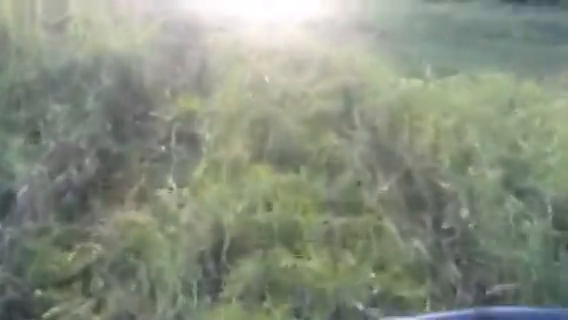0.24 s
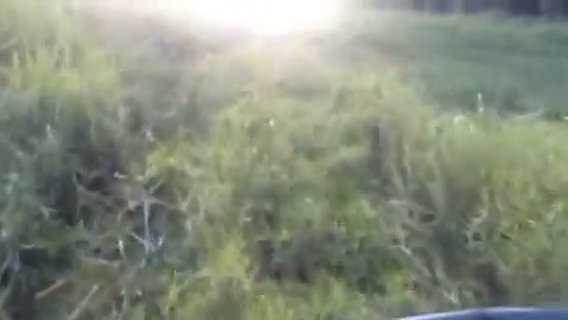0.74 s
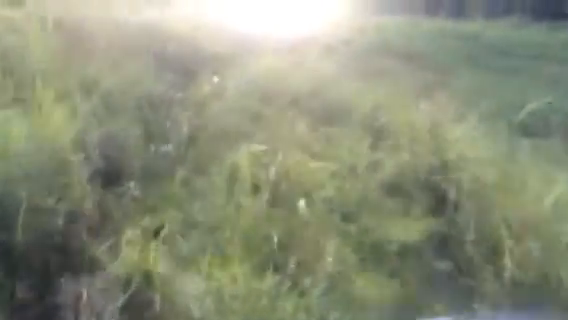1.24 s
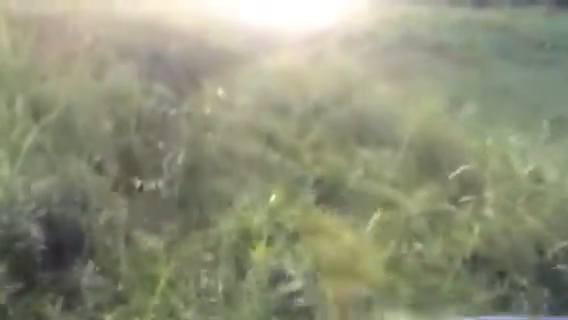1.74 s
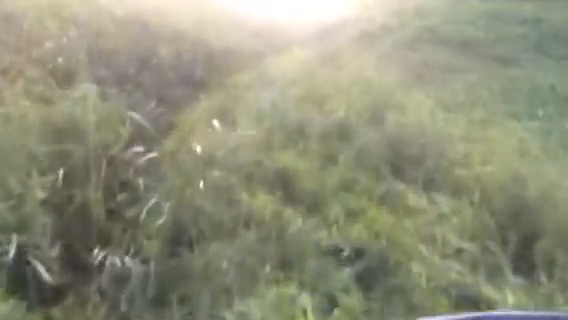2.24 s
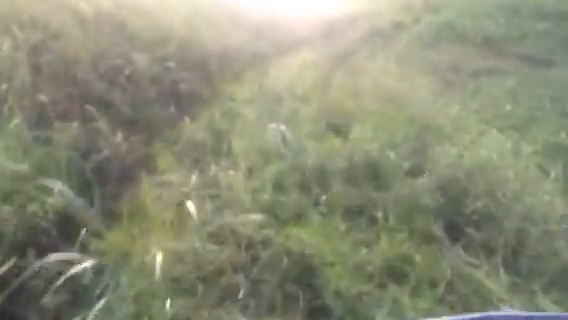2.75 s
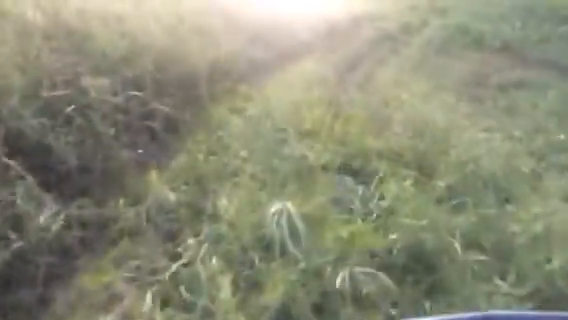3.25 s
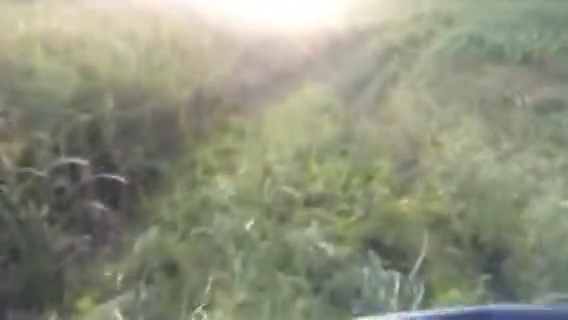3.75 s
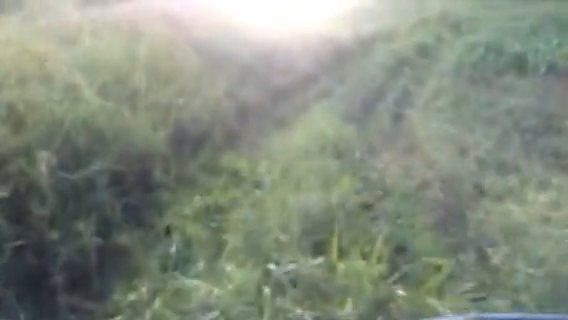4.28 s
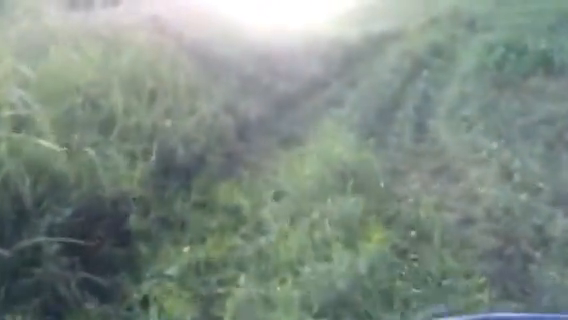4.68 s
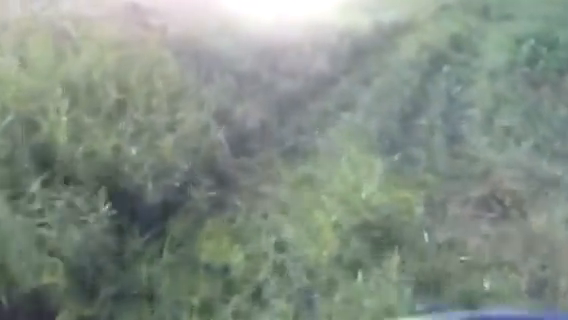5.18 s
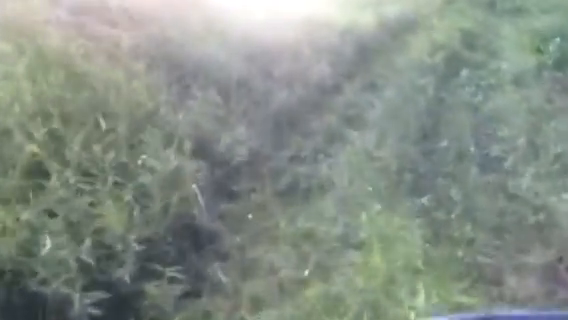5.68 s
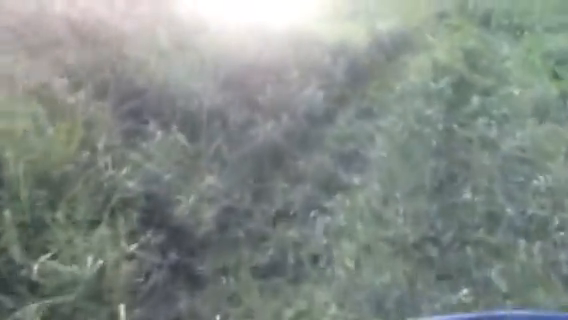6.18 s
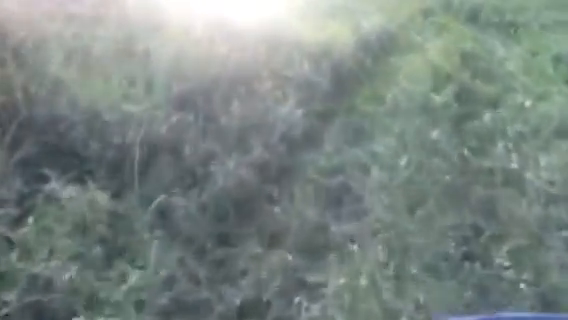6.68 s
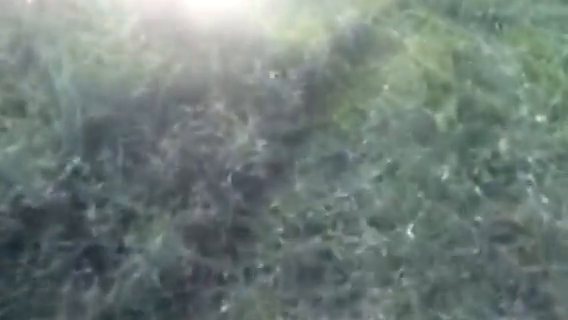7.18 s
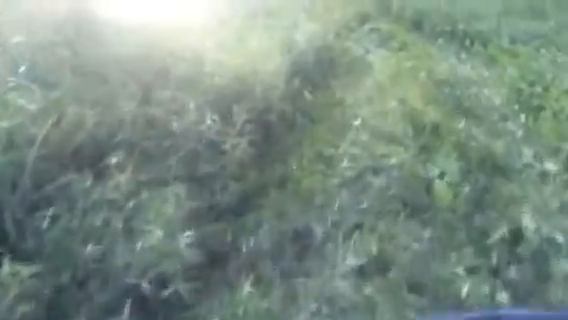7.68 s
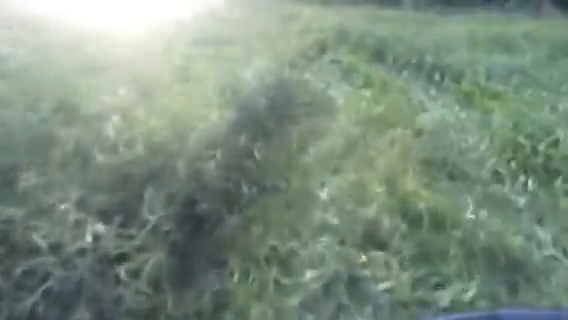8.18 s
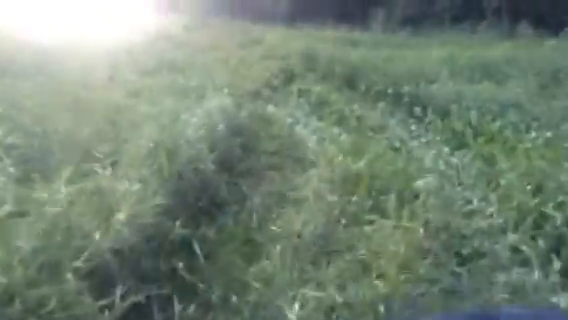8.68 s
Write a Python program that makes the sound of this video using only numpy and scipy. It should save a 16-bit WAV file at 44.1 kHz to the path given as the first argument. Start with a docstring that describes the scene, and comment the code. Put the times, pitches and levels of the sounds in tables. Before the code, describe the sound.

A small four-stroke off-road vehicle drones with a low, rapid putter, heard from the seat as it crosses a field. Tyres rumble, gears whine faintly, and tall grass brushes and ticks against the front over a thin insect buzz. After about three seconds the engine sags and hardens under load. A thud and a short rattling clack shake the body midway, then the engine recovers its even drone.

```python
"""In a field of tall grass, heard from the seat of a small four-stroke off-road vehicle.
Each firing excites the muffler, so the engine drones in harmonics of the firing rate. On rough ground
it sags, its note hardens, and two jolts ring the modes of a body panel and shake loose parts.
Meshing gears whine faintly over the rumble of the tyres, stalks brush and snap on the front,
and insects buzz in the field as the vehicle passes."""
import sys
import numpy as np
from scipy import signal
from scipy.fft import rfft, irfft, next_fast_len
from scipy.io import wavfile
from scipy.ndimage import uniform_filter1d

SR = 44100
rng = np.random.default_rng(int(sys.argv[2]) if len(sys.argv) > 2 else 0)


def log_audio(samples):
    """Write samples as a 16-bit WAV file to the path given in sys.argv[1]."""
    # one column per channel
    frames = np.atleast_2d(samples).T
    # limit to full scale, then quantise
    limited = np.clip(frames, -1, 1)
    pcm = np.round(limited * 32767).astype(np.int16)
    wavfile.write(sys.argv[1], SR, pcm)


N = 393813
TIME = np.arange(N) / SR


# harmonics of the exhaust: order, light_throttle_db, open_throttle_db
EXHAUST_HARMONICS = [(2, -41, -58), (4, -35, -36.5), (5, -25, -25.5), (6, -22.5, -23.5), (7, -36.5, -40.5),
                     (8, -59.5, -31.5), (9, -50.5, -28.5), (10, -46.5, -34), (11, -45.5, -53.5),
                     (12, -68, -44), (13, -62, -50), (14, -64.5, -52)]
# muffler resonances, from thud to bark: centre_order, half_width_orders, delay_cycles
MUFFLER_CHAMBERS = [(4, .5, .76), (5.65, .5, .758), (8.6, .5, .792), (10.2, .5, .771), (11, .5, .745),
                    (12.6, .5, .785)]
# weak firings as the engine bogs down: centre_s, depth_db, half_length_s
WEAK_FIRINGS = [(3.143, -17, 0.022), (3.307, -6, 0.09), (3.78, -5, 0.12)]
def exhaust(turns, rate, throttle, jitter_cycles=0.0042, uneven_db=0.45, waver_db=0.8, gas_db=-41):
    """Periodic excitation: each firing rings the muffler in a putt of harmonics and a puff of gas."""
    stumble_db = sum(db * np.exp(-((TIME - s) / half) ** 2) for s, db, half in WEAK_FIRINGS)
    lull = cycle_pulse(turns, at=0.604, half=0.069)  # the quiet just before each firing
    lull_db = (-2 - 7 * throttle ** 2) * lull  # deeper under load, so the beats harden
    speed_db = 0.5 * (rate - 19)  # louder as the engine runs faster
    unrest = 1 + 1.1 * throttle ** 2  # a labouring engine fires less evenly
    crank = turns + jitter_cycles * unrest * each_firing(turns)
    note = gas_puffs(lull) * gain_of(gas_db) * np.sqrt(unrest)
    boom_order = MUFFLER_CHAMBERS[1][0]
    for order, light_db, open_db in EXHAUST_HARMONICS:
        centre, half_width, delay = min(MUFFLER_CHAMBERS, key=lambda chamber: abs(order - chamber[0]))
        lag = np.arctan((order - centre) / half_width)  # phase shift of the nearest resonance
        off_boom = np.clip(abs(order - boom_order) - .5, 0, 2)  # the boom is steady, the bark varies
        db = light_db + throttle * (open_db - light_db) + waver_db * off_boom * drift(8.3)
        db += stumble_db * (0.28 if off_boom > 1 else 1)  # a weak firing loses mostly its boom
        note += np.sqrt(2) * gain_of(db) * np.cos(2 * np.pi * order * (crank - delay) - lag)
    return note * gain_of(speed_db + lull_db + uneven_db * unrest * each_firing(turns))


# spectrum of the exhaust gas: frequency_hz, density_db
GAS_SPECTRUM = [(40, -23), (75, 1), (120, -1.5), (160, -1), (215, -8.5), (300, -27.5), (600, -58)]
def gas_puffs(lull):
    """Pulsating flow: the low noise of escaping gas stops in each lull."""
    return (1 - lull) * noise(GAS_SPECTRUM)


# impacts of piston, then valves: phase_cycles, strength, half_length_cycles
ENGINE_CLACKS = [(.08, 0.26, .15), (.39, 0.25, 0.15)]
# modes of the block and covers: pitch_hz, bandwidth_hz, level_db
BLOCK_MODES = [(331, 79, 4.5), (470, 103, -2), (720, 120, -7), (970, 67, -5), (1317, 220, -5),
               (1688, 21, -12), (2517, 31, -15.5)]
# spectrum of the churning drive: frequency_hz, density_db
CHURN_SPECTRUM = [(120, -2), (220, 6), (400, -3.5), (650, -2.5), (1100, -6), (1500, -12.5), (2200, -21.5),
                  (4000, -25), (9000, -53)]
def clatter(turns, throttle, ring_db=-47, churn_db=-46, grain_db=1.33):
    """Impact excitation: piston and valves ring the block, harder under load, as the drive churns."""
    clacks = sum(size * (1 + 0.62 * drift(22)) * cycle_pulse(turns, at, half)
                 for at, size, half in ENGINE_CLACKS)
    beat = 1 + (clacks - clacks.mean()) * (1 + 0.34 * throttle)
    force = beat * rng.standard_normal(N) * gain_of(grain_db * drift(220))
    ring = sum(gain_of(db) * resonate(force, hz, width).real / np.sqrt(width)
               for hz, width, db in BLOCK_MODES)
    churn = noise(CHURN_SPECTRUM) * abs(beat) ** 0.55 * gain_of(0.47 * drift(90))
    return gain_of(ring_db) * evened(ring) + gain_of(churn_db) * evened(churn)


# spectrum of the rolling tyres: frequency_hz, density_db
TYRE_SPECTRUM = [(12, -6), (25, 8), (38, 5), (55, 17), (80, 7.5), (120, 16), (170, 7.5), (260, -14.5),
                 (500, -40)]
def ride(turns, rumble_db=-34, shudder_db=-44.5, shudder_hz=38, wander_hz=7):
    """Forced vibration: tyres rumble, shaken by each firing; the frame shudders at a wandering pitch."""
    shake = 1 + 0.044 * np.cos(2 * np.pi * (turns - .02))
    shudder = np.sqrt(2) * np.sin(phase_of(shudder_hz + wander_hz * drift(2)))
    return gain_of(rumble_db) * shake * noise(TYRE_SPECTRUM) + gain_of(shudder_db) * shudder


# blows on the body: start_s, peak_db, centre_hz
BODY_BLOWS = [(4.814, -8.5, 159), (4.825, -12, 203), (4.821, -23, 496), (4.832, -41, 1300),
              (4.876, -27, 205), (5.5, -45, 1321), (4.973, -23.5, 200), (4.982, -34, 750),
              (4.998, -31, 240), (5.019, -39, 480), (5.058, -26.5, 285), (5.0585, -19, 580),
              (5.064, -35, 1500), (5.069, -29, 705), (5.7, -39, 620), (6.4, -50, 900)]
# modes of a body panel: pitch_hz, level_db, decay_s (to fall about 40 dB)
PANEL_MODES = [(139, 10.5, 0.043), (175, 11, 0.061), (239, 10, 0.07), (320, -2, 0.053), (408, 9, 0.022),
               (525, 7.5, 0.04), (608, 10.5, 0.03), (690, 3, 0.082), (994, 14.5, 0.035), (1540, -3, 0.012),
               (2440, 8, 0.03)]
def knocks(band_ratio=1.21, chatter_db=-44, chatter_t60_s=0.36, direct_db=-8):
    """Modal ringing: soft blows excite a panel's low modes and thud; hard ones reach higher and clack."""
    out, t = np.zeros(N), np.arange(SR // 4) / SR
    for s, peak_db, blow_hz in BODY_BLOWS:
        jolt = gain_of(chatter_db - 60 * t / chatter_t60_s) * rng.standard_normal(len(t))
        jolt[0] = -1  # the impulse ahead of the chatter
        band_hz = [blow_hz / band_ratio, blow_hz * band_ratio]
        blow = signal.lfilter(*signal.butter(2, band_hz, "bandpass", fs=SR), jolt)
        ring = sum(gain_of(db) * resonate(blow, hz, 1.48 / decay).real for hz, db, decay in PANEL_MODES)
        direct = peaked(blow, direct_db) * blow_hz / (blow_hz + 700)
        add(out, s, peaked(peaked(ring) + direct, peak_db))
    return out


# bursts of rattling: peak_s, level_db, rise_s, fall_s
RATTLE_SWELLS = [(4.83, -52, 0.011, 0.027), (4.98, -45.5, 0.045, 0.047), (5.064, -35, .006, 0.017)]
# spectrum of the loose parts: frequency_hz, density_db
LOOSE_SPECTRUM = [(120, -15), (270, 11), (450, 1), (1050, -3), (1700, -5), (2700, -10), (5000, -32)]
def rattle(grain_db=4):
    """Random amplitude modulation: loose parts chatter roughly around the two jolts."""
    return swells(RATTLE_SWELLS) * evened(noise(LOOSE_SPECTRUM) * gain_of(grain_db * drift(300)))


COVER_HZ, COVER_WIDTH_HZ = 1085.6, 51  # resonance of the thin gear cover
FLICKER_DB = 2.5  # rms waver in the level of the gear tones
# tone of the final drive, following ground speed: time_s, pitch_hz
DRIVE_PITCH = [(0, 995), (1.3, 990), (1.7, 965), (2.3, 977), (2.6, 957), (3.1, 943), (3.6, 899), (3.8, 848),
               (4.5, 782), (5.3, 765), (6.3, 815), (6.8, 830), (7.0, 884), (7.3, 886), (7.5, 925),
               (8.0, 948), (8.5, 942), (8.93, 918)]
# whine as the teeth take up load: peak_s, level_db, rise_s, fall_s
WHINE_SWELLS = [(.1, -54, 0.079, 0.17), (.65, -59, 0.18, .15), (1.2, -52.5, 0.3, 0.4),
                (2.2, -58, 0.38, 0.52), (2.85, -54.5, 0.32, 0.67), (3.65, -53.5, 0.088, 0.29),
                (4.5, -59, 0.63, 0.51), (7.15, -54.5, 0.35, 0.32), (8.1, -54.5, 1, 2.1)]
def final_drive(flutter=0.011, pair_ratio=4 / 3, pair_db=-56.5):
    """Gear meshing: the drive whines, and a second pair sounds as it crosses the cover's resonance."""
    hz = curves(DRIVE_PITCH)[0]
    mesh = phase_of(hz * (1 + flutter * drift(60)))
    whine = swells(WHINE_SWELLS) * gain_of(FLICKER_DB * drift(23)) * np.sin(mesh)
    pair = gain_of(pair_db + FLICKER_DB * drift(23)) * np.sin(pair_ratio * mesh)
    detuning = (pair_ratio * hz - COVER_HZ) / (COVER_WIDTH_HZ / 2)
    return np.sqrt(2) * (whine + pair / np.hypot(1, detuning))


# singing of the timing gear: peak_s, level_db, rise_s, fall_s
TIMING_SWELLS = [(0, -55, .1, 0.16), (.58, -52, 0.21, 0.24), (1.6, -59, 0.63, 1)]
def timing_gear(turns, order=35):
    """Gear meshing: a wavering tone at a high multiple of the firing rate."""
    level = swells(TIMING_SWELLS) * gain_of(FLICKER_DB * drift(23))
    return np.sqrt(2) * level * np.sin(2 * np.pi * order * turns + 0.56 * drift(20.64))


# shaft tones at resonance: order, light_throttle_db, open_throttle_db, resonant_firing_hz
SHAFT_TONES = [(15, -56, -61, 19.4), (17, -52.5, -80, 19.1), (19, -54, -44, 19.6)]
def shafts(turns, rate, throttle, half_width_hz=0.5):
    """Resonance: each shaft tone follows the engine and is reinforced near one firing rate."""
    out = np.zeros(N)
    for order, light_db, open_db, resonant_hz in SHAFT_TONES:
        db = light_db + throttle * (open_db - light_db) + 0.69 * drift(5.4)
        level = gain_of(db) / np.hypot(1, (rate - resonant_hz) / half_width_hz)
        out += level * np.sin(2 * np.pi * order * turns + 1.17 * drift(22))
    return np.sqrt(2) * out


def cover(level_db=-60):
    """Natural frequency: shaken by the drive, the thin gear cover rings faintly at its own pitch."""
    return gain_of(level_db) * whistle(COVER_HZ, COVER_WIDTH_HZ)


# patches of taller grass: peak_s, level_db, rise_s, fall_s
TALL_PATCHES = [(.4, -59, .5, 0.28), (2.3, -64.5, 0.34, 0.55), (3.6, -57.5, 0.38, 0.97),
                (5.32, -58, 0.19, 0.23), (8.9, -57, 0.75, .5)]
# spectrum of brushing blades: frequency_hz, density_db
BRUSH_SPECTRUM = [(800, -21), (2000, -2), (3000, -2.5), (3800, 3.5), (4900, 0.5), (6400, 4), (7600, -2),
                  (9000, -11), (12000, -22), (15400, -14)]
def grass(steady_db=-56):
    """Friction noise: blades brush the vehicle in a fine hiss, louder in tall patches."""
    level = np.hypot(gain_of(steady_db), swells(TALL_PATCHES))
    return level * gain_of(0.28 * drift(250)) * noise(BRUSH_SPECTRUM)


# thick stalks hitting the front: start_s, peak_db, centre_hz, bandwidth_hz, scrape_t60_s
STALK_HITS = [(0.468, -28.5, 3000, 960, 0.015), (0.4687, -30, 9000, 8000, .008),
              (.587, -37, 4500, 4000, .015), (1.262, -33.5, 7500, 5000, 0.017),
              (1.283, -34, 7000, 5000, .012), (1.365, -36, 6500, 4000, .012),
              (1.4906, -27.5, 5630, 4500, 0.014), (1.495, -36, 5430, 4500, .025),
              (1.663, -30, 6500, 5000, 0.007), (1.683, -32, 6600, 5030, 0.035),
              (1.788, -30.5, 6230, 4800, .045), (3.025, -39, 12500, 7000, .03),
              (3.745, -37, 6300, 2000, .02), (3.902, -35, 7000, 3960, 0.06),
              (4.022, -38, 7500, 4000, 0.032), (5.022, -37, 11000, 6000, .02),
              (5.288, -35, 9000, 7040, 0.12), (5.338, -35, 6000, 5000, 0.055),
              (6.948, -43, 11500, 3950, 0.08), (7.932, -37, 7400, 4060, 0.033),
              (8.608, -35, 13970, 3040, 0.025)]
def stalks(scrape_db=-15):
    """Heavily damped impact: each stalk snaps against the front and scrapes off."""
    out, t = np.zeros(N), np.arange(SR // 8) / SR
    for s, db, hz, width, t60 in STALK_HITS:
        crack = rng.standard_normal(len(t)) * gain_of(scrape_db - 60 * t / t60)
        crack[0] = 1  # the impulse ahead of the scrape
        snap = resonate(resonate(crack, hz, width), hz, width).real
        add(out, s, peaked(snap, db))
    return out


def seed_heads(per_s=22, level_db=-63, decay_s=0.025):
    """Shot noise: seed heads tick on the bodywork at random, a few harder than the rest."""
    strength = gain_of(3 * np.minimum(rng.exponential(1, N), 3))
    hits = strength * (rng.random(N) < per_s / SR)
    envelope = signal.lfilter([1], [1, -np.exp(-1 / (decay_s * SR))], hits)
    hiss = noise([(1500, -15), (3000, -2), (6500, 0), (9500, -9), (15400, -17)])
    return gain_of(level_db) * evened(envelope * hiss)


# groups of insects passed: peak_s, level_db, rise_s, fall_s
CHORUS_SWELLS = [(.45, -51, 1, 0.31), (1.4, -55, 0.94, 0.77), (2.1, -48.5, 0.39, 0.74),
                 (2.6, -52, 0.34, 0.45), (3.175, -52, .015, 0.55), (4.1, -56, 0.95, 1.3),
                 (5.2, -52.5, 0.22, 0.66), (6.3, -65, .4, .4), (8.3, -65, .4, .4)]
# spectrum of their buzz: frequency_hz, density_db
CHORUS_SPECTRUM = [(3000, -2), (6000, 0.5), (8000, 1.5), (10500, 2), (13500, 3), (15400, -0.5)]
def insect_chorus():
    """Incoherent sources: many singers merge into a high noise that swells as each group is passed."""
    return swells(CHORUS_SWELLS) * noise(CHORUS_SPECTRUM)


# rasps of one close bush cricket: peak_s, level_db, rise_s, fall_s
CRICKET_RASPS = [(1.76, -52, 0.93, 0.08), (1.865, -44.5, 0.014, .14), (2.02, -46.5, .07, .04)]
# spectrum of a rasp: frequency_hz, density_db
RASP_SPECTRUM = [(6000, -30), (10000, -5), (12000, 0), (14000, 4), (15400, -2.5)]
def cricket(wing_hz=44):
    """Stridulation: wing strokes pulse a very high noise into a rasp."""
    stroke = 2 * np.pi * wing_hz * TIME + .7 * drift(10)
    wings = (.6 + .4 * np.cos(stroke)) ** 1.5 * gain_of(1.5 * drift(30))
    return swells(CRICKET_RASPS) * evened(wings * noise(RASP_SPECTRUM))


# thin insect trills: peak_s, level_db, rise_s, fall_s
TRILL_SWELLS = [(3.4, -64, 0.7, 1.6), (5.9, -68, 0.47, 1.5)]
def insect_trills(pitch_hz=8130, width_hz=300, pulse_hz=70):
    """Amplitude modulation: rapid pulses break a thin whistle into a trill."""
    pulses = (.5 + .5 * np.cos(phase_of(pulse_hz + 9 * drift(9.6)))) ** 2
    return swells(TRILL_SWELLS) * evened(pulses * whistle(pitch_hz, width_hz))


# short high insect chirps: peak_s, level_db
HIGH_CHIRPS = [(5.812, -58), (6.985, -59), (8.24, -58)]
def insect_chirps(pitch_hz=14600, width_hz=350, half_s=0.018):
    """Tone bursts: each chirp is a brief swell of a very high whistle."""
    return swells([(s, db, half_s, half_s) for s, db in HIGH_CHIRPS]) * whistle(pitch_hz, width_hz)


def gain_of(db):
    """Decibels to amplitude."""
    return 10 ** (np.asarray(db) / 20)


def evened(x):
    """Normalisation to rms 1."""
    return x / np.sqrt(np.mean(x ** 2) + 1e-20)


def peaked(x, db=0):
    """Normalisation to a peak level."""
    return gain_of(db) * x / abs(x).max()


def phase_of(hz):
    """Phase in radians, the integral of frequency."""
    return 2 * np.pi * np.cumsum(hz) / SR


def curves(rows):
    """Linear interpolation of each column of a timed table."""
    s, *columns = np.transpose(rows)
    return [np.interp(TIME, s, column) for column in columns]


def swells(rows):
    """Power addition: the joint amplitude of sounds that each rise to a peak and fall away."""
    t = TIME[::64]
    power = sum((gain_of(db) * np.exp(-((t - s) / np.where(t < s, rise, fall)) ** 2)) ** 2
                for s, db, rise, fall in rows)
    return np.interp(TIME, t, np.sqrt(power))


def cycle_pulse(turns, at, half):
    """A Gaussian pulse of height 1 in every cycle; position and half length are in cycles."""
    return np.exp(-(((turns - at + .5) % 1 - .5) / half) ** 2)


def each_firing(turns):
    """Sample and hold: a random value drawn for every firing and kept while it rings."""
    return uniform_filter1d(rng.standard_normal(200)[(turns + .36).astype(int)], size=300)


def drift(per_s):
    """Random modulation of rms 1, gliding to a new value per_s times a second."""
    return evened(np.interp(TIME * per_s, np.arange(4000), rng.standard_normal(4000)))


def noise(spectrum):
    """Spectral shaping: noise of rms 1 with the given relative spectrum."""
    size = next_fast_len(N)
    hz, db = np.transpose(spectrum)
    shape_db = np.interp(np.log(np.fft.rfftfreq(size, 1 / SR) + 1), np.log(hz), db)
    return evened(irfft(rfft(rng.standard_normal(size)) * gain_of(shape_db), size)[:N])


def resonate(x, hz, width):
    """A damped oscillator: a click makes it ring as a dying sine."""
    radius = np.exp(-np.pi * width / SR)
    return 2 * signal.lfilter([1 - radius], [1, -radius * np.exp(2j * np.pi * hz / SR)], x)


def whistle(hz, width):
    """Narrow-band noise: a fuzzy tone of rms 1, made by the same resonance twice."""
    return evened(resonate(resonate(rng.standard_normal(N), hz, width), hz, width).real)


def add(mix, s, sound):
    """Superposition: mixes a sound in at time s."""
    part = mix[round(s * SR):][:len(sound)]
    part += sound[:len(part)]


# engine speed: time_s, firing_hz
FIRING_RATE = [(0.0, 19.075), (0.4, 19.167), (1.2, 19.168), (2.4, 18.749), (3.15, 18.016), (3.3, 16.235),
               (3.6, 17.268), (3.8, 16.468), (4.8, 16.933), (5.2, 17.956), (5.6, 17.636), (6.0, 18.795),
               (6.6, 18.565), (7.0, 19.727), (8.93, 19.222)]
# throttle: time_s, opening (0 to 1)
THROTTLE_OPENING = [(0, 0.03), (1.1, 0), (2.5, 0.48), (3.1, 0.3), (3.2, 0.81), (3.5, 0.96), (4.1, 0.96),
                    (4.75, 0.7), (5.3, 0.57), (6.1, 0.54), (6.7, 0.17), (7.4, 0.32), (8.2, 0), (8.93, 0.04)]
def scene(sway_cycles=0.011, sway_hz=1.415, sway_peak_s=0.42):
    """Superposition: the engine's sounds share one cycle, and body, grass and insects add to them."""
    rate, throttle = curves(FIRING_RATE)[0], curves(THROTTLE_OPENING)[0]
    # the engine note sways slightly and regularly, about 1.4 times a second
    sway = sway_cycles * np.cos(2 * np.pi * sway_hz * (TIME - sway_peak_s))
    turns = np.cumsum(rate) / SR + sway  # counts firing cycles
    engine = exhaust(turns, rate, throttle) + clatter(turns, throttle)
    gears = final_drive() + timing_gear(turns) + shafts(turns, rate, throttle) + cover()
    body = ride(turns) + knocks() + rattle()
    plants = grass() + stalks() + seed_heads()
    insects = insect_chorus() + cricket() + insect_trills() + insect_chirps()
    return (engine + gears + body + plants + insects)[None]


def record(dry, low_hz=12, high_hz=15450):
    """Band limiting: filters remove the deepest bass and the highest treble."""
    passed = signal.lfilter(*signal.butter(1, low_hz, "highpass", fs=SR), dry)
    lowpass = signal.firwin(511, high_hz, window=("kaiser", 9), fs=SR)
    return signal.oaconvolve(passed, lowpass[None], "same")


dry = scene()
out = record(dry)
log_audio(out)
```